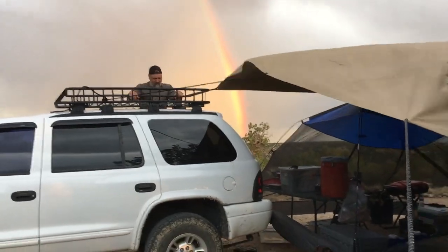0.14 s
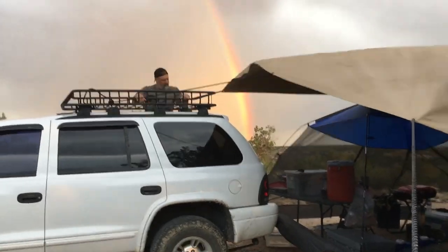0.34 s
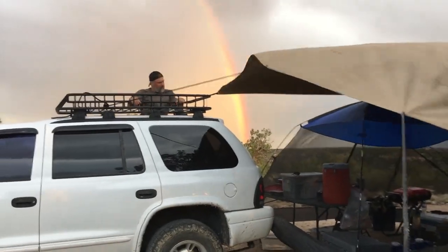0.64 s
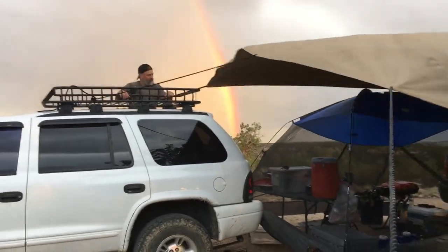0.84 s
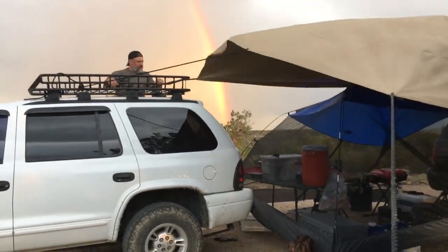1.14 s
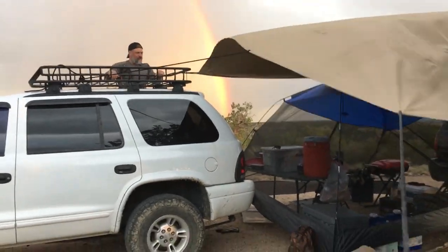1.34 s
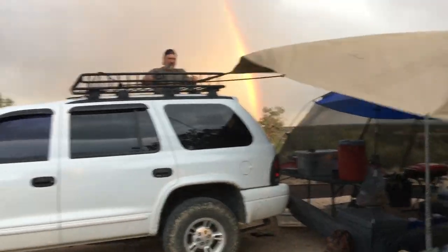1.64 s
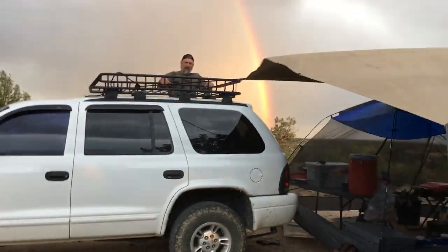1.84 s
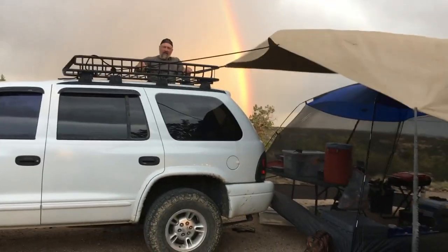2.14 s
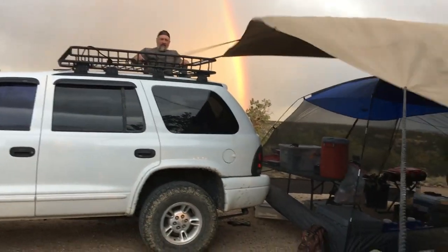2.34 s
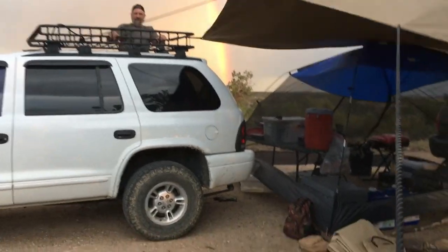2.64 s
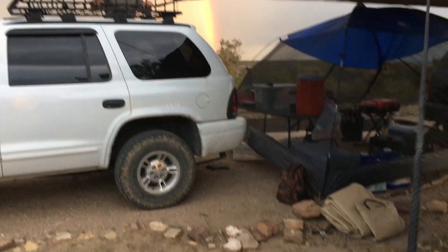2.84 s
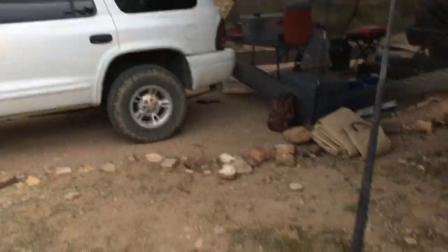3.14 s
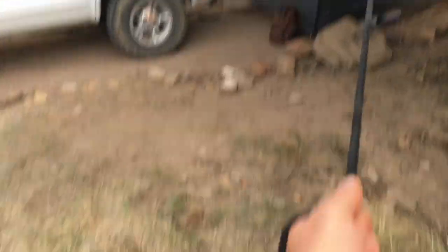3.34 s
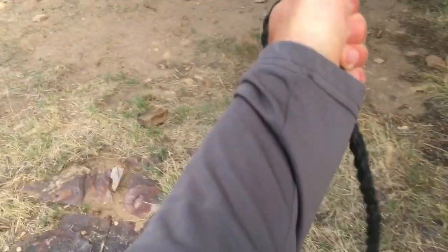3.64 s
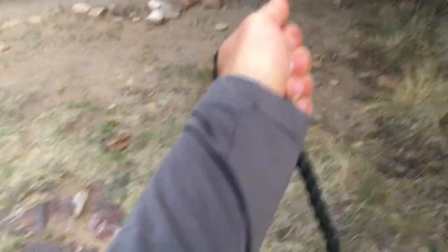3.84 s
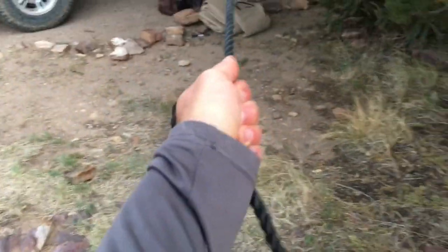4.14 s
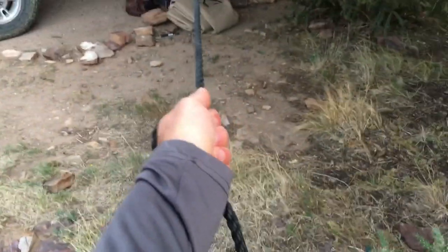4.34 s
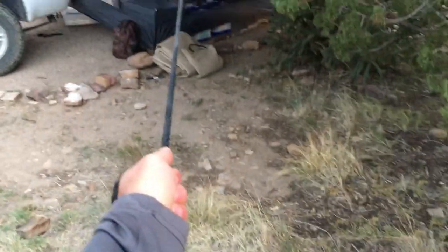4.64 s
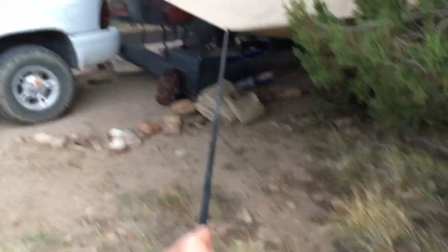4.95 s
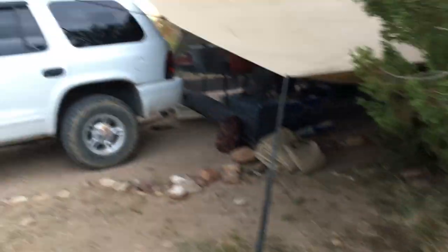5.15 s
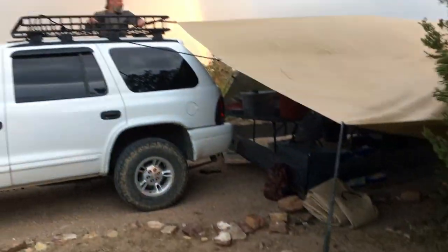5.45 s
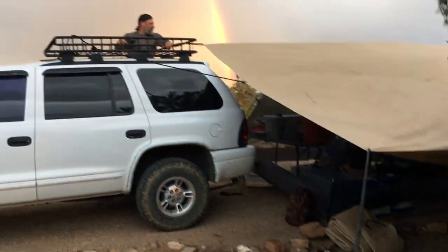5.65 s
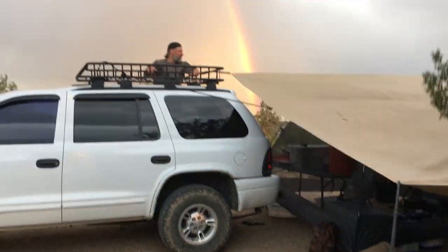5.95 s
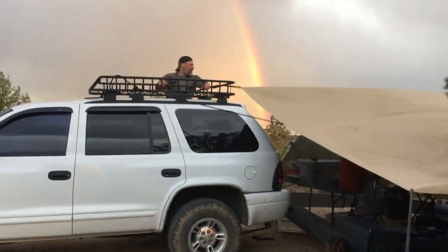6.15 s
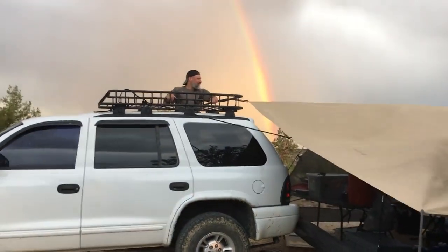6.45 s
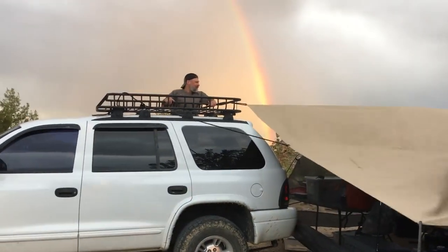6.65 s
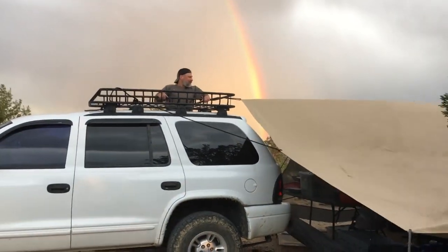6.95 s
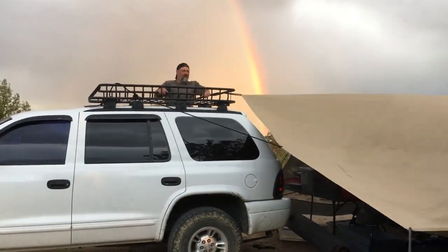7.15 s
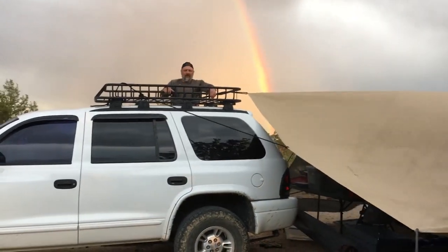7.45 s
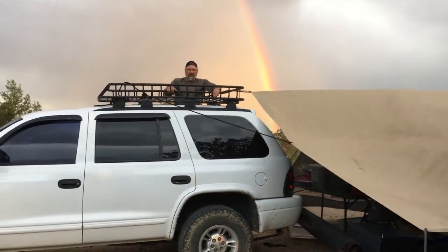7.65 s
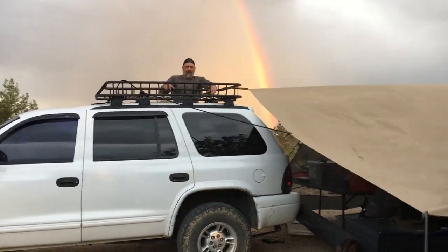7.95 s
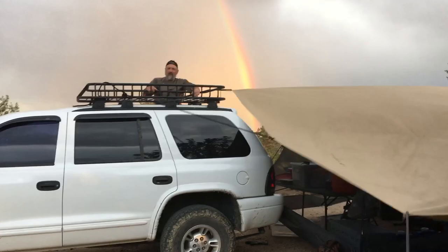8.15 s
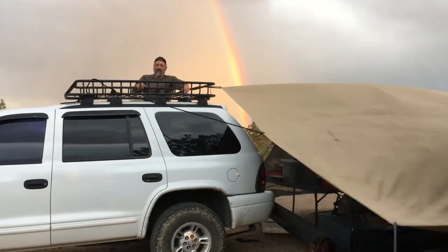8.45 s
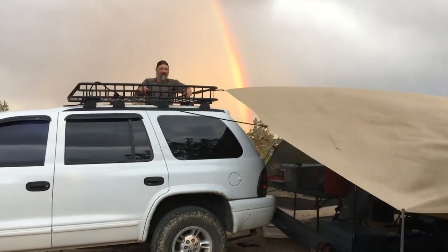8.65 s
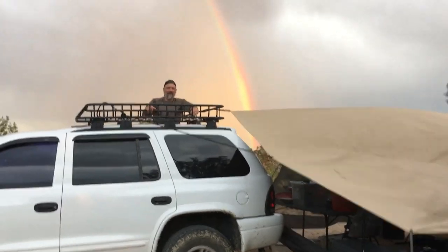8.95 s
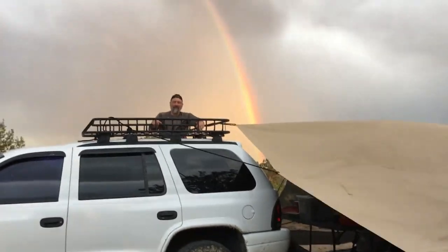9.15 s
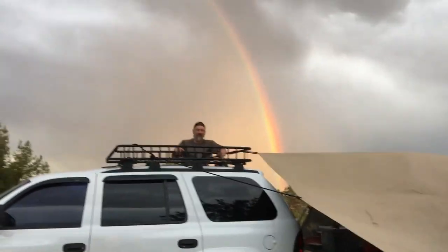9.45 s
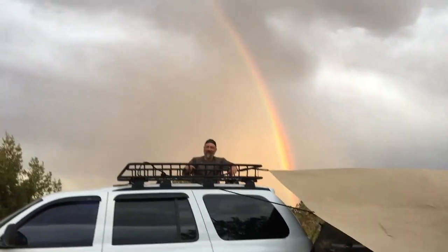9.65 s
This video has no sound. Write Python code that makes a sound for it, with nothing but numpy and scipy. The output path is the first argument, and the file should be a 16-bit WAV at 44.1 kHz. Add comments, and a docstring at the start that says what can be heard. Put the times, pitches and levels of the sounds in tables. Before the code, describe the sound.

Wind gusts buffet the microphone as a canvas awning rushes nearby and a sleeve rustles, then the wind eases.

```python
"""A hand-held microphone at a windy camp, with scrub and a canvas awning rushing some way off.
From the start gusts buffet the port: faster air sweeps smaller eddies past it, so the rumble grows
ragged and bright in each. From about 2.5 s a sleeve rustles close by, and the last hard gusts hit
before 4 s. The wind then eases, a few small ticks fall, and a brief swish rises at the very end.
A faint insect band hums far off throughout."""
import sys
import numpy as np
from scipy import signal
from scipy.fft import rfft, irfft, next_fast_len
from scipy.io import wavfile
from scipy.ndimage import uniform_filter1d, minimum_filter1d, map_coordinates

SR = 44100
rng = np.random.default_rng(int(sys.argv[2]) if len(sys.argv) > 2 else 0)


def unload_wav(signal):
    """Save mono or channel-first audio to the path in sys.argv[1] as 16-bit WAV at rate SR, clipped to [-1, 1]."""
    wavfile.write(
        sys.argv[1],
        SR,
        np.round(np.clip(np.atleast_2d(signal).T, -1, 1) * 32767).astype(np.int16),
    )


N = 432621

# Spectrum of the preamp's own noise: (frequency [Hz], relative level [dB])
PREAMP_SPECTRUM = [(2000, -11), (7000, -5), (11000, -1), (14700, -0.5), (16000, -3)]
# Narrow bands in the background: (centre [Hz], width [Hz], level [dB])
HUM_BANDS = [(4444, 28, -72.5), (1182, 15, -71)]
# Wind some way off: (time [s], scrub level [dB], canvas level [dB])
FAR_WIND_LEVELS = [(0, -61.5, -57.5), (2.0, -62.5, -60.5), (3.2, -58.5, -57), (3.4, -55, -48),
                   (3.6, -57.5, -51), (4.0, -61.5, -60), (5.5, -62, -57.5), (5.62, -61.5, -50.5),
                   (5.85, -61, -52), (7, -59.5, -52.5), (8.7, -57.5, -49.5), (9.55, -57.5, -49.5),
                   (9.81, -52, -45)]
# Hiss of the scrub: (frequency [Hz], relative level [dB])
SCRUB_SPECTRUM = [(300, -10.5), (1500, -1.5), (2910, -1), (4300, -1), (4860, -4), (7010, -7.5),
                  (9500, -14.5), (12000, -36), (16000, -41)]
# Roar in the awning: (frequency [Hz], relative level [dB])
CANVAS_SPECTRUM = [(20, -37), (60, 5.5), (200, 0), (777, -8), (1180, -6.5), (2000, -13.5), (2910, -21),
                   (5000, -35.5)]
# A brief rising swish: (time [s], level [dB], centre [Hz])
SWISH_GLIDE = [(9.66, -75, 400), (9.7, -47, 603), (9.75, -54, 1205), (9.78, -75, 1400)]
# Small dry clicks: (time [s], peak [dB], centre [Hz], width [Hz], time to fall 60 dB [s])
DRY_TICKS = [(2.413, -35.5, 7360, 2480, 0.014), (2.426, -43.5, 4970, 5960, 0.08),
             (5.891, -50, 8500, 3000, .01), (6.251, -50, 6000, 8000, .01), (8.0333, -49, 7000, 8040, 0.022),
             (8.2204, -45, 14600, 900, .02), (8.2886, -45.5, 9700, 3020, 0.014),
             (8.66, -47, 6500, 4000, .02), (8.6759, -33.5, 990, 2400, .03), (8.71, -51, 13500, 2000, 0.02),
             (8.797, -55, 12000, 6000, .01)]
# Cloth rubbing near the microphone: (start [s], hold [s], level [dB])
SLEEVE_STROKES = [(2.55, 0.94, -68), (3.36, 0.22, -59.5), (3.65, 0.24, -56.5), (4.28, 0.059, -58.5),
                  (4.41, 0.078, -56.5), (4.6, 0.03, -59.5)]
# Scratch of its fibres: (frequency [Hz], relative level [dB])
SLEEVE_SPECTRUM = [(500, -27), (1000, -9), (2470, -8.5), (4960, -8.5), (6500, -2.5), (8750, -5.5),
                   (12000, -12), (16000, -25)]
# Eddies at the port, before the treble loss: (frequency [Hz], relative level [dB])
EDDY_SPECTRUM = [(15, -48), (27, -22), (40, -4), (60, 4.5), (100, 1.5), (250, -4), (500, -8), (1600, -12),
                 (10000, -39.5)]
# The strongest sudden small eddies: (middle [s], peak before the limiter [dB])
STRONG_JABS = [(.272, -12), (.338, -5), (.401, -15), (.443, -10), (.5, -20), (.694, -25), (.767, -21),
               (.778, -19), (.827, -15.5), (.87, -25), (.895, -9), (.932, 1), (.984, -18), (1.175, -14.5),
               (1.263, -23), (1.458, -20), (1.547, -16), (1.592, -31), (1.664, -25), (1.694, -14),
               (1.778, -6), (2.07, -25.5), (2.481, -24), (2.545, -25), (2.773, -31), (2.996, -26),
               (3.068, -16.5), (3.123, -14), (3.135, -14), (3.485, -22), (3.526, -17), (3.578, -30),
               (3.663, -14), (3.676, 1), (3.816, -7), (3.921, -24.5), (3.955, -32), (4.034, -25.5),
               (4.144, -17), (4.233, -17), (4.306, -27), (4.616, -30), (4.904, -32), (5.03, -27),
               (5.127, -23), (5.155, -23.5), (5.214, -30), (5.266, -23.5), (6.684, -34), (6.707, -26)]
# Flow at the port between gusts: (time [s], bass level [dB], air speed [dB])
PORT_BREEZE = [(0, -46, 6), (.2, -34, 14), (.6, -28, 14.5), (1.8, -26.5, 1), (1.92, -39.5, 6),
               (2.4, -38, 6), (3.15, -28, 11), (3.25, -37.5, -3.5), (4.1, -32.5, -1), (4.65, -41, -1),
               (4.78, -32.5, -4), (5.2, -33, 7.5), (5.7, -46, -11), (6.0, -53, -1), (6.3, -41, -5),
               (7.0, -58, 0.5), (7.9, -45, -3.5), (8.4, -53.5, -1), (9.0, -47.5, -2.5), (9.81, -48, -5)]
# Gusts at the port: (start [s], hold [s], bass level [dB], air speed [dB])
PORT_GUSTS = [(0.051, .03, -33.5, 6), (0.272, 0.076, -16.5, 19.5), (0.317, 0.032, -13, 25.5),
              (0.393, 0.11, -22.5, 24), (0.518, 0.067, -26, 20.5), (0.695, .04, -30, 17),
              (.76, 0.058, -23.5, 20.5), (0.865, .05, -22.5, 21), (0.919, .04, -23, 27),
              (0.978, 0.07, -24.5, 17), (1.125, 0.094, -28, 22.5), (1.249, 0.032, -25.5, 14.5),
              (1.32, 0.028, -25.5, 13), (1.457, 0.15, -23, 19.5), (1.668, 0.13, -25, 22.5),
              (1.753, 0.052, -24.5, 27), (1.865, .01, -33, 13.5), (2.069, 0.052, -27, 17.5),
              (2.177, .02, -32.5, 12.5), (2.273, 0.012, -33.5, 11.5), (2.337, 0.031, -29, 3),
              (2.473, 0.027, -32.5, 8.5), (2.519, 0.18, -29.5, 11.5), (2.767, 0.16, -24.5, 10.5),
              (2.985, 0.049, -24, 15.5), (3.036, .05, -16.5, 14.5), (3.112, 0.028, -18, 22.5),
              (3.359, 0.012, -30.5, 7), (3.47, .06, -19.5, 8), (3.565, 0.0071, -18.5, 10),
              (3.654, 0.031, -20, 21), (3.818, 0.056, -21, 20.5), (3.917, .04, -29, 10.5),
              (4.041, 0.017, -30, 12.5), (4.114, .03, -28, 14.5), (4.238, 0.024, -25.5, 11),
              (4.279, 0.029, -22, 8.5), (4.349, 0.056, -26.5, 8), (4.463, 0.15, -25.5, 1),
              (4.595, 0.087, -26.5, 5.5), (4.881, 0.034, -23, 4.5), (5.009, 0.041, -27, 10),
              (5.117, 0.105, -27, 11), (5.255, 0.018, -29, 14), (5.427, 0.072, -33, 2.5),
              (5.559, 0.023, -27.5, -8), (5.627, .11, -35, -1.5), (5.875, 0.055, -37, 2),
              (6.128, 0.045, -34, 6.5), (6.436, .02, -35.5, 1), (6.68, 0.041, -24.5, 6.5),
              (6.783, 0.073, -31.5, 1), (7.206, 0.028, -45, 6), (7.339, 0.024, -39.5, -1),
              (7.442, 0.021, -38.5, -4.5), (7.88, 0.084, -36, -1.5), (8.16, 0.035, -34, -1),
              (8.564, .02, -38, 0), (8.748, 0.034, -31.5, -1.5), (8.93, 0.021, -23.5, 2.5),
              (8.993, 0.088, -37.5, -3), (9.214, .02, -39.5, 4), (9.346, 0.023, -29.5, -3),
              (9.424, 0.019, -28.5, -4), (9.626, 0.024, -40.5, -3), (9.774, 0.018, -41.5, 1)]

REACH_HZ = 100  # at air speed 0 dB the eddy spectrum loses 10 dB over each such span
JAB_HALF_S, JAB_FASTER_DB = .00187, 3  # half length; speed over the air around it
STRAY_DB, STRAY_GROWTH, STRAY_SCATTER_DB = -50.5, 1.1, 2.5  # lesser jabs: peak, dB per dB of speed, spread
PREAMP_DB, CEILING_DB, TOP_HZ = -69.5, -11, 15760


def amp(db):
    """Decibels to gain."""
    return 10 ** (np.asarray(db) / 20)


def unit(x):
    """Scaled to rms 1."""
    return x / np.sqrt(np.mean(x ** 2) + 1e-20)


def along(points, hz):
    """Interpolate (frequency, value) points on a log axis."""
    knots_hz, values = np.transpose(points)
    return np.interp(np.log(hz + 1), np.log(knots_hz + 1), values)


def curves(rows):
    """One value per sample for each column after the time."""
    times, *columns = np.transpose(rows)
    return [np.interp(np.arange(N) / SR, times, column) for column in columns]


def ridge(rows, rise_db_per_s, fall_db_per_s):
    """The highest of many (start, hold, level) shapes that rise, hold and fall."""
    t = np.arange(0, N / SR + .002, .001)
    start, hold, top = np.transpose(rows)[:, :, None]
    before, after = np.maximum(start - t, 0), np.maximum(t - start - hold, 0)
    shapes = top - rise_db_per_s * before - fall_db_per_s * after
    return np.interp(np.arange(N) / SR, t, shapes.max(axis=0))


def wobble(rate):
    """A smooth random curve, rate knots a second."""
    knots = rng.standard_normal(int(N * rate / SR) + 4)
    return map_coordinates(knots, [np.arange(N) * rate / SR])


def filtered(x, response):
    """x shaped by a response of frequency."""
    size = next_fast_len(len(x) + 8192)
    return irfft(rfft(x, size) * response(np.fft.rfftfreq(size, 1 / SR)), size)[:len(x)]


def resonance(hz, centre_hz, width_hz):
    """Response of a causal band-pass resonance."""
    return 1j * hz * width_hz / (centre_hz ** 2 - hz ** 2 + 1j * hz * width_hz)


def rush(spectrum, patchy_db):
    """Noise of rms 1 with patches of random gain across time and frequency."""
    cells = signal.stft(rng.standard_normal(N), nperseg=512)[2]
    patches = uniform_filter1d(rng.standard_normal(cells.shape), size=6, axis=0)
    patches = uniform_filter1d(patches, size=14, axis=1)
    noise = signal.istft(cells * amp(patchy_db * unit(patches)), nperseg=512)[1][:N]
    return unit(filtered(noise, lambda hz: amp(along(spectrum, hz))))


def hums():
    """Two thin wavering bands of noise, the upper one like far insects."""
    out = 0
    for centre_hz, width_hz, db in HUM_BANDS:
        gain = amp(db + 0.8 * wobble(7.3))
        band = filtered(rng.standard_normal(N), lambda hz: resonance(hz, centre_hz, width_hz))
        out += gain * unit(band)
    return out


def far_wind():
    """Some way off, wind hisses in the scrub and roars in the canvas; the two swell together."""
    scrub_db, canvas_db = curves(FAR_WIND_LEVELS)
    swell = wobble(5.1)
    scrub = amp(scrub_db + 0.25 * swell) * rush(SCRUB_SPECTRUM, patchy_db=1.0)
    canvas = amp(canvas_db + 0.34 * swell + 0.18 * wobble(16)) * rush(CANVAS_SPECTRUM, patchy_db=1.0)
    return scrub + canvas


def swish():
    """A narrow band of noise whose centre glides up."""
    level_db, centre_hz = curves([(0.015, -120, 400)] + SWISH_GLIDE)  # starts from silence
    return amp(level_db) * wobble(260) * np.sin(2 * np.pi * np.cumsum(centre_hz) / SR)


def ticks():
    """Small dry clicks, each a dying puff of noise in one broad resonance."""
    out, t = np.zeros(N + 4096), np.arange(4096) / SR
    for start, db, centre_hz, width_hz, t60 in DRY_TICKS:
        puff = rng.standard_normal(len(t)) * amp(-60 * t / t60)
        tick = filtered(puff, lambda hz: resonance(hz, centre_hz, width_hz) ** 2)
        out[round(start * SR):][:len(t)] += amp(db) * tick / abs(tick).max()
    return out[:N]


def sleeve():
    """Close to the microphone, dense fibre scratches under each stroke of the arm."""
    level_db = ridge(SLEEVE_STROKES, rise_db_per_s=120, fall_db_per_s=200)
    return amp(level_db + wobble(40)) * rush(SLEEVE_SPECTRUM, patchy_db=2.5)


def air_at_port():
    """Bass level and air speed in dB: the breeze, or a gust where that is stronger."""
    breeze_db, breeze_speed_db = curves(PORT_BREEZE)
    start, hold, bass, speed = np.transpose(PORT_GUSTS)
    gust_db = ridge(np.c_[start, hold, bass], rise_db_per_s=394, fall_db_per_s=302)
    gust_speed_db = ridge(np.c_[start, hold, speed], rise_db_per_s=619, fall_db_per_s=518)
    return np.maximum(breeze_db, gust_db), np.maximum(breeze_speed_db, gust_speed_db)


def jabs(speed_db):
    """Puffs of fast, fine turbulence hit the port; lesser ones come by chance and grow with air speed."""
    out, t = np.zeros(N + 2048), (np.arange(2048) - 1024) / SR
    stray_times = rng.uniform(0, N / SR, size=120)
    stray_db = STRAY_DB + STRAY_GROWTH * speed_db[(stray_times * SR).astype(int)]
    stray_db += STRAY_SCATTER_DB * rng.standard_normal(len(stray_times))
    for middle, db in list(STRONG_JABS) + list(zip(stray_times, stray_db)):
        at = int(middle * SR)
        reach_hz = REACH_HZ * amp(speed_db[at] + JAB_FASTER_DB)
        puff = rng.standard_normal(len(t)) * np.exp(-(t / JAB_HALF_S) ** 2)
        jab = filtered(puff, lambda hz: amp(along(EDDY_SPECTRUM, hz) - 10 * hz / reach_hz)
                       * hz / (hz + 400))  # thinned below 400 Hz
        out[at:][:len(t)] += amp(db) * jab / abs(jab).max()
    return out[1024:][:N]  # centres each puff on its time


def buffet(level_db, speed_db):
    """Eddies rumble right on the port; faster air brings smaller ones, reaching further into the treble."""
    flutter_db = 1.1 * wobble(30) + 1.85 * wobble(150) + 2.18 * wobble(500)
    reach_hz = REACH_HZ * amp(speed_db + flutter_db)
    smooth = rng.standard_normal(N)
    spiky = unit(smooth * amp(4.24 * wobble(480) + 1.7 * wobble(70)))  # fine eddies strike one by one
    rumble, bass_power, band_octaves = 0, 0, .4
    for centre_hz in 22 * 2 ** (np.arange(22) * band_octaves):
        def band_response(hz):
            offset = np.clip(np.log2((hz + 1) / centre_hz) / band_octaves, -1, 1)
            return np.cos(np.pi / 2 * offset) ** 2 * amp(along(EDDY_SPECTRUM, hz))
        band = filtered(smooth if centre_hz < 200 else spiky, band_response)
        gain = amp(-10 * centre_hz / reach_hz)
        rumble += gain * band
        if centre_hz < 250:
            bass_power += gain ** 2 * np.mean(band ** 2)
    lumps = amp(0.88 * wobble(12) + 2.64 * wobble(26) + 1.23 * wobble(60))  # large eddies come unevenly
    return amp(level_db) * unit(lumps) * rumble / np.sqrt(bass_power)


def scene():
    """The wind on the port and the camp behind it, at one hand-held microphone."""
    level_db, speed_db = air_at_port()
    port = buffet(level_db, speed_db) + jabs(speed_db)
    return (port + far_wind() + swish() + sleeve() + ticks() + hums())[None]


def record(dry):
    """Preamp hiss joins, a fast limiter holds the peaks, and nothing passes above the band limit."""
    mic = dry[0] + amp(PREAMP_DB) * rush(PREAMP_SPECTRUM, patchy_db=1.0)
    needed_gain = np.minimum(1, amp(CEILING_DB) / (abs(mic) + 1e-9))
    gain = uniform_filter1d(minimum_filter1d(needed_gain, size=161), size=81)
    return filtered(mic * gain, lambda hz: hz < TOP_HZ)[None]


dry = scene()
out = record(dry)
unload_wav(out)
```